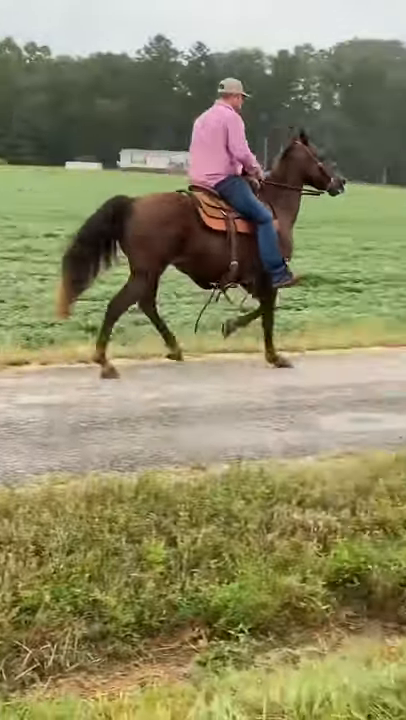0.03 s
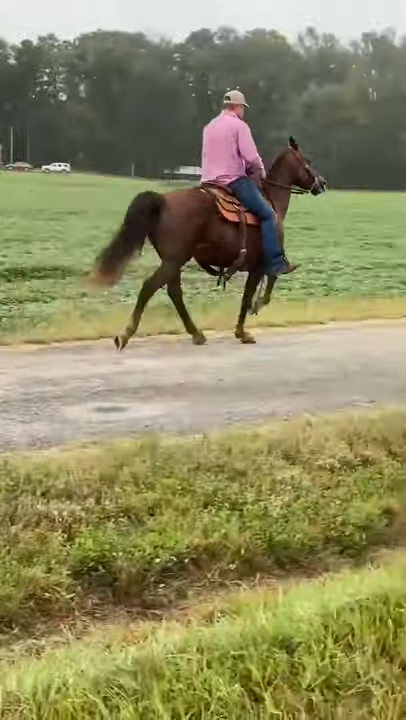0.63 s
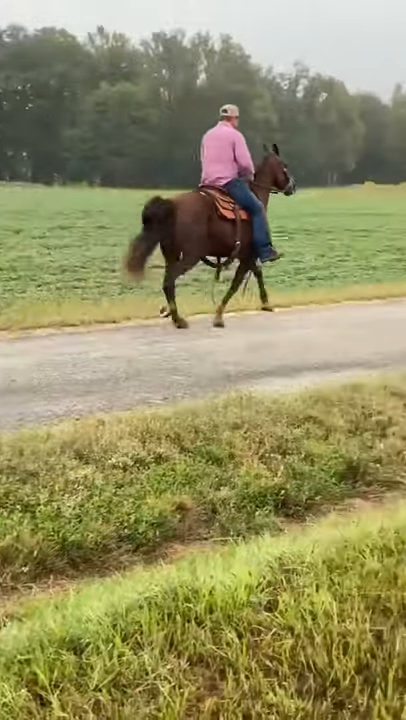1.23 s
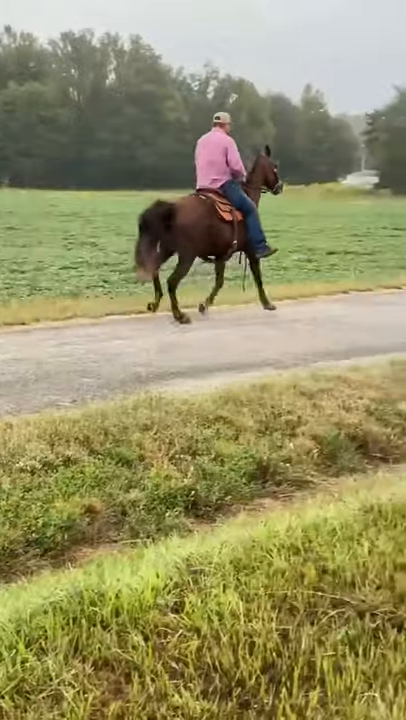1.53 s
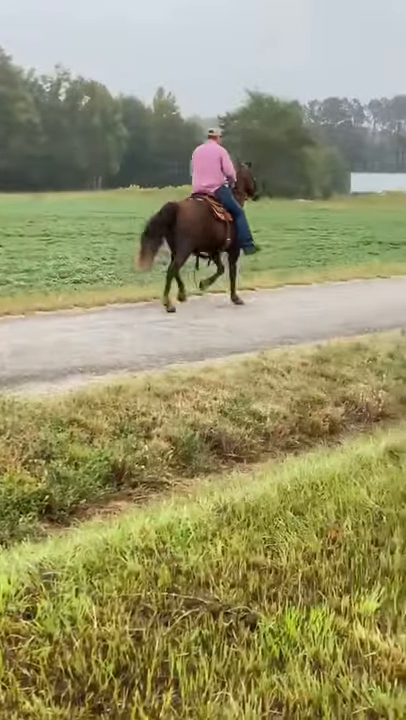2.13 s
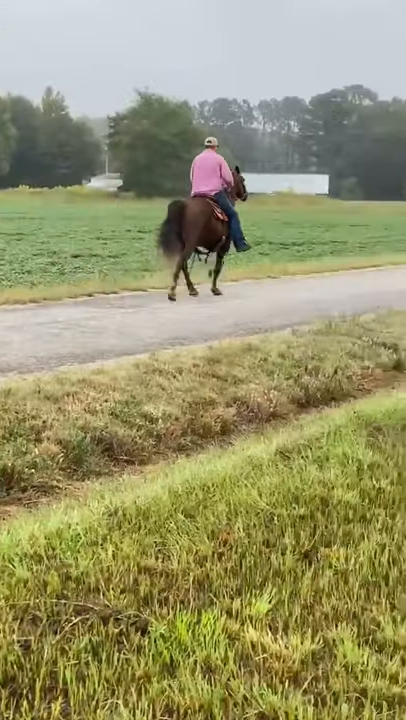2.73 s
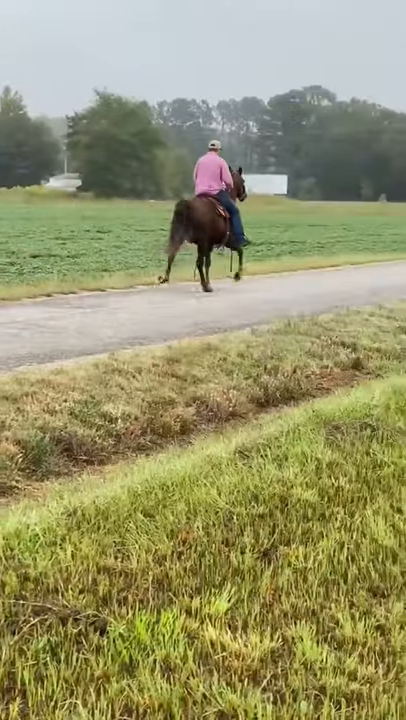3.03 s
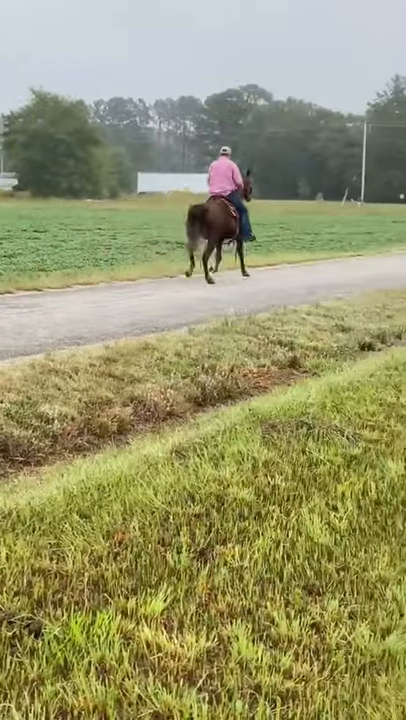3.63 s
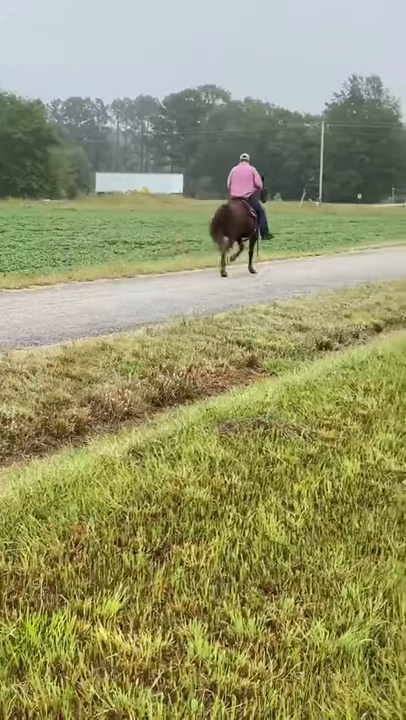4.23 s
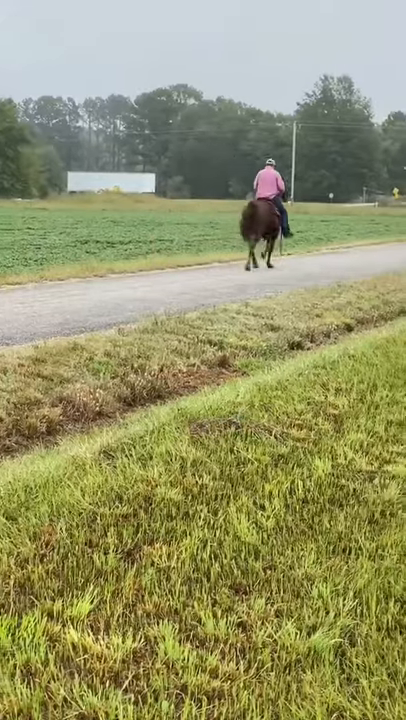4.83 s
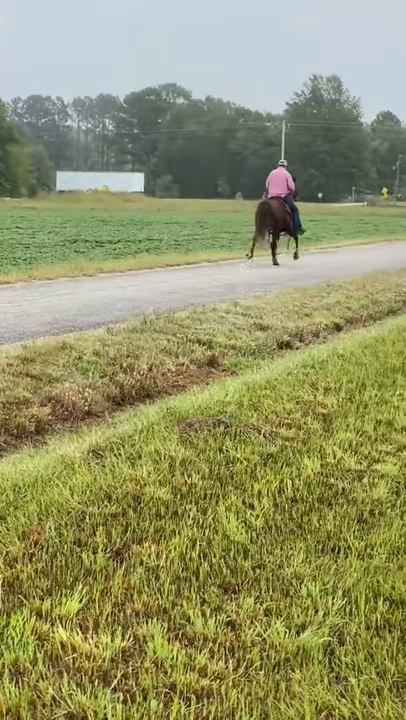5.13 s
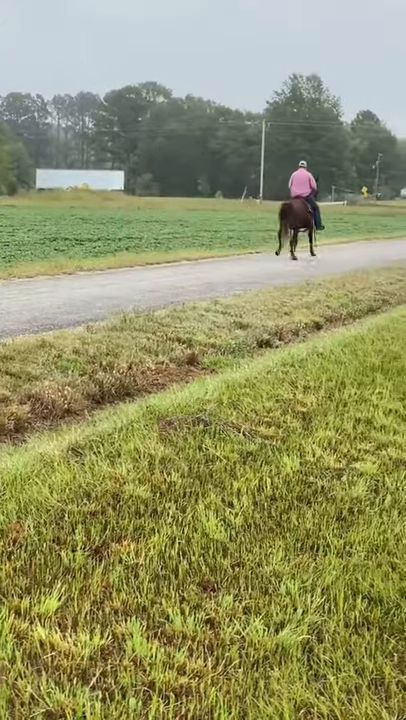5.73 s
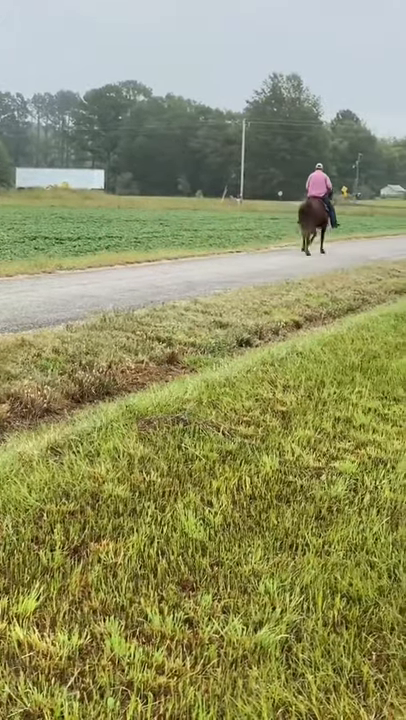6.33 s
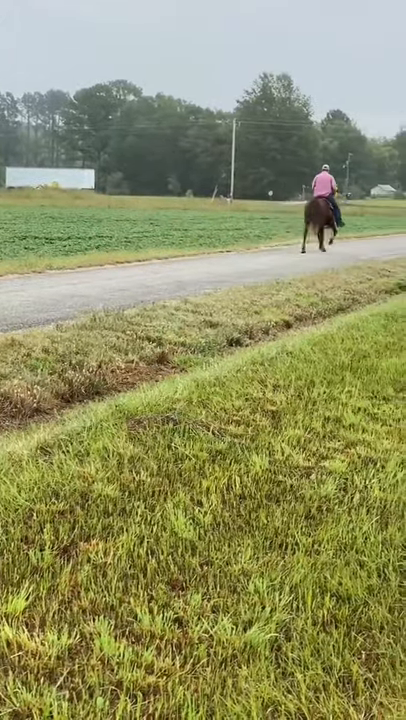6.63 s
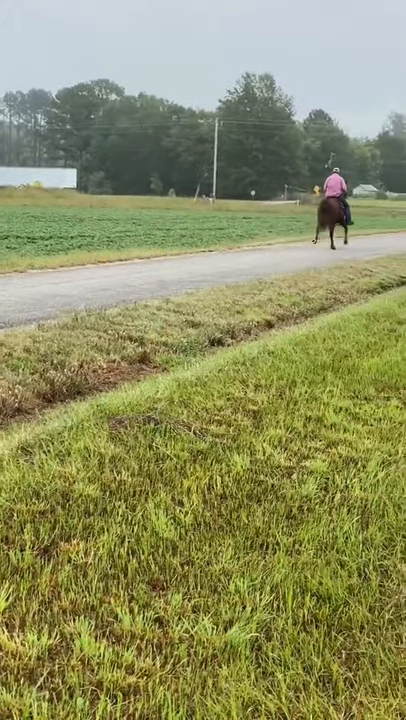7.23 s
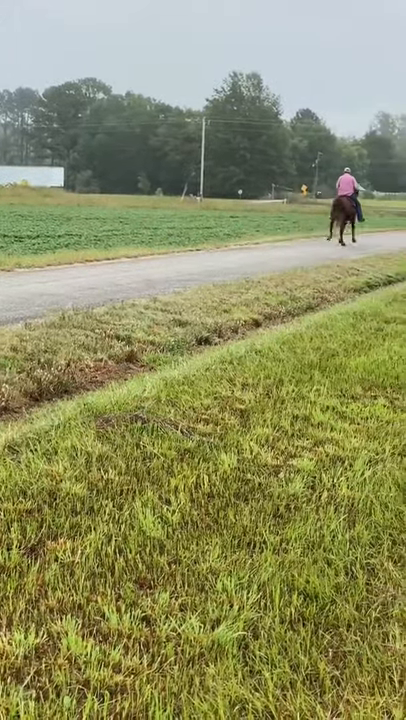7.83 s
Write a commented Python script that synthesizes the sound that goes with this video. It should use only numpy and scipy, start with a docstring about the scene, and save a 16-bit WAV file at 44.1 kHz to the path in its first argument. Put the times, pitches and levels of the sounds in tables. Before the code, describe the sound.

A shod horse trots along a paved country road, starting a few metres from the microphone. Its hooves make quick, even, hollow clops with sharp iron clicks, a little crunching grit and occasional scuffs. The beats slowly grow quieter as the horse moves away. Faint, high insect rasping builds in the fields, over still air and a soft low rumble that dies out.

```python
"""A ridden horse trots away along a paved country road, from about 4 m to 22 m off the microphone.
Each shod hoof taps with the toe, lands flat with a hollow clop of trapped air, crunches grit and sends
a late thud through the ground; hooves scuff as they lift. Insects rasp their wings in the fields,
growing louder, over still air and a low rumble that dies away. The microphone has two close ports."""
import sys
import numpy as np
from scipy import signal
from scipy.fft import rfft, irfft, next_fast_len
from scipy.io import wavfile

SR = 44100
rng = np.random.default_rng(int(sys.argv[2]) if len(sys.argv) > 2 else 0)


def transcribe(signal):
    """Save signal, clipped to [-1, 1], as a 16-bit WAV file at the path in sys.argv[1]."""
    frames = np.atleast_2d(signal).T
    limited = np.clip(frames, -1, 1)
    pcm = np.round(limited * 32767).astype(np.int16)
    wavfile.write(sys.argv[1], SR, pcm)


N = 347067
TIME = np.arange(N) / SR
AGE = np.arange(-1323, 5292) / SR  # seconds around one hoof contact
# The road passes ROAD_M from the microphone; hoof levels are set for that distance.
ROAD_M, SPEED_M_S, NEAREST_S = 4, 2.6, -.5

# hoof beats, leg after leg: start_s, clop_db, crack_db, pitch_hz
HOOF_BEATS = [(0.0262, -20.5, -30.5, 980), (0.1628, -17, -33.5, 933), (0.2892, -14, -33.5, 922),
              (0.426, -29, -37, 1060), (0.5562, -26.5, -36.0, 897), (0.6975, -25, -37.5, 980),
              (0.8231, -16, -26, 897), (0.9588, -25.5, -38.5, 980), (1.0891, -31.5, -35.0, 1034),
              (1.2379, -27.5, -32, 972), (1.3533, -25, -34.5, 907), (1.491, -27, -33, 956),
              (1.6213, -24, -29, 930), (1.7641, -24.5, -29.5, 976), (1.8804, -21, -32.5, 802),
              (2.0271, -29, -33, 1023), (2.1524, -28.5, -36, 843), (2.2918, -25.5, -31.5, 866),
              (2.4141, -19.0, -26.5, 900), (2.5694, -25.5, -28.5, 975), (2.6849, -26.0, -33.5, 933),
              (2.8206, -25.0, -31, 1000.0), (2.9427, -17.5, -26, 902), (3.1024, -25, -30.5, 1027),
              (3.2197, -21.0, -23.5, 932), (3.3565, -22, -30, 1066), (3.4667, -23.5, -29.5, 896),
              (3.6388, -24.5, -31.5, 923), (3.7515, -28, -30.5, 920.0), (3.8939, -25.5, -33, 950),
              (4.0043, -18.5, -22, 906), (4.1671, -31.0, -36.5, 874), (4.2842, -21.0, -23, 940),
              (4.422, -23, -31, 964), (4.5374, -24.5, -29, 944), (4.6973, -31.5, -37.0, 1025),
              (4.8116, -24.0, -24.5, 970), (4.9507, -25.0, -35.5, 900), (5.0631, -22.5, -35, 975),
              (5.2263, -34.0, -35.5, 930), (5.3405, -20, -28.0, 1010), (5.4856, -32, -37, 965),
              (5.5964, -28, -23.5, 935), (5.7622, -39, -29, 1024), (5.8723, -24.5, -27.5, 988),
              (6.0146, -28, -27.5, 952), (6.1205, -26.0, -31, 1020.0), (6.295, -31.5, -32, 987),
              (6.4059, -37, -29, 957), (6.5451, -26.5, -30.0, 1023), (6.658, -24, -28, 956),
              (6.8239, -38, -27.5, 950), (6.9408, -32, -29, 970), (7.0702, -27, -26.5, 980.0),
              (7.1928, -28.5, -29, 1044), (7.357, -44.0, -32.5, 1020), (7.4783, -32, -29.5, 963),
              (7.6095, -38, -34.5, 936), (7.7341, -46, -35.5, 1005)]
# how each leg lands and lifts (hind, fore, hind, fore), before the force of the step is added:
# toe_lead_s, toe_db, heel_lag_s, heel_re_clop_db, crunch_db, thud_db, lift_lag_s, lift_db
LEG_HABITS = [(.010, -39.5, 0.025, -22, -45, -44.5, 0.027, -58.5),
              (.0104, -41.5, .0075, -9, -36.5, -42, .069, -42.5),
              (0.0043, -37, 0.0072, -15.5, -38.5, -40.5, 0.099, -49),
              (.0102, -39, 0.0043, -11.5, -32, -40, 0.15, -52)]
# harder scrapes and clacks between beats: time_s, length_s, hollow_db, scrape_db
HARD_SCUFFS = [(0.227, 0.008, -47, -42), (0.363, 0.0059, -44, -53), (0.492, 0.0025, -44.5, -45),
               (0.511, 0.011, -49, -40.5), (1.025, 0.0028, -35.5, -37.5), (1.292, 0.011, -39, -49),
               (1.56, 0.0035, -38.5, -42.5), (2.088, 0.0064, -50, -37.5), (2.624, 0.008, -35.5, -37),
               (2.898, 0.0042, -36, -37), (3.012, 0.002, -30.0, -46), (3.422, 0.01, -47, -61),
               (3.68, 0.0056, -45, -37), (3.959, 0.0048, -60.5, -37), (4.096, 0.0032, -60, -39.0),
               (4.2, 0.023, -36.5, -37.5), (4.36, 0.0068, -38.0, -40.5), (4.493, 0.015, -42, -39.5),
               (5.001, 0.0049, -42, -40.0), (5.028, 0.011, -40, -38.5), (5.166, 0.0077, -42.0, -42),
               (5.276, 0.004, -40, -32.0), (5.809, 0.011, -52, -34.5), (6.073, 0.007, -46, -33.0),
               (6.733, 0.0043, -40.0, -37.5), (6.874, 0.011, -50.0, -43.5)]
# resonances of the hoof and its hollow: pitch_ratio, level_db, t60_s
HOOF_MODES = [(.82, -12.5, .012), (1, 0, .019), (1.02, -22, .05), (1.17, -7, .009), (1.38, -12, .009),
              (2.35, -14, .009)]
# rings of the iron shoe: pitch_hz
SHOE_RINGS = [1741, 2085, 3205, 6170]
# dull knocks of the leg: pitch_hz, level_re_thud_db
LEG_KNOCKS = [(240, 1), (345, -7), (470, -4.5)]
# weight of the thuds along the road: time_s, gain_db
THUD_TREND = [(0, 0.5), (1, -2), (4.1, -2.5), (4.6, -6), (6, -10.5), (7.87, -3)]
# iron striking the paving: frequency_hz, level_db
CRACK_SPECTRUM = [(30, -67), (350, -10), (600, -20.5), (850, -7.5), (1300, 4), (1700, -1.5), (2300, 2),
                  (2750, 0), (3200, -2.5), (4200, -1.5), (5000, -3.5), (6200, -10), (7200, -7.5),
                  (11000, -44)]
# grit grinding: frequency_hz, level_db
GRIT_SPECTRUM = [(30, -27), (400, -21.5), (630, -10), (1000, -1), (1600, 0), (2250, -1.5), (2750, -2.5),
                 (3200, -4.5), (4300, -7), (6200, -8), (7300, -18), (11000, -49.5)]
# fine sand hissing: frequency_hz, level_db
SAND_SPECTRUM = [(3000, -38), (6000, -13), (7300, -1), (8600, 0), (10500, -6), (11900, -22)]
# the near insect rasp: frequency_hz, level_db
RASP_SPECTRUM = [(5000, -45), (7000, -18), (7900, -6), (8400, 0), (8950, -1), (9300, -13), (9650, -35),
                 (12000, -50)]
# insects further into the field: frequency_hz, level_db
SHIMMER_SPECTRUM = [(5000, -40), (7000, -10), (7700, -3), (8300, 0), (8700, -8), (9300, -30), (12000, -45)]
# swell of all the insects: time_s, gain_db
INSECT_TREND = [(0, -11), (4.5, -3.5), (5.8, 0), (7.87, 0)]
# still country air: frequency_hz, level_db
AIR_SPECTRUM = [(20, -21.5), (45, 3.5), (90, -10), (200, 2), (400, -9.5), (600, -8), (950, -1), (1450, -18),
                (2200, -16), (3500, -15.5), (4400, -17), (5600, -16), (7000, -27.5), (9000, -41),
                (12000, -56.5)]
# low outdoor rumble: frequency_hz, level_db
RUMBLE_SPECTRUM = [(20, -16), (45, 1), (90, 3), (150, 1.5), (300, -8), (550, -7), (950, -4), (1500, -32.5),
                   (4000, -61.5), (8000, -48)]
# the rumble dying away: time_s, level_db
RUMBLE_TREND = [(0, -57.5), (1.4, -57.5), (2.8, -60.5), (4.3, -62.5), (4.7, -67), (5.3, -83), (7.87, -103)]
# lead of the left microphone port over the right: frequency_hz, phase_rad
PORT_PHASE = [(60, .1), (300, .3), (700, .4), (1100, .2), (1700, .15), (2400, .4), (3900, .45), (5000, 1.7),
              (5700, 1.3), (6500, 2.1), (7800, 2.65), (11500, 2.7)]


def horse(field_db=-33, fade_s=.093, onset_s=.0041):
    """Trot and scuffs at the microphone, with a faint scatter back from the verge and the field."""
    track = trot()
    for s, length_s, hollow_db, scrape_db in HARD_SCUFFS:
        add(track, s, spreading(s) * scuff(s, length_s, hollow_db, scrape_db))
    t = TIME[:SR // 2]
    scatter = rng.standard_normal(len(t)) * np.exp(-t / fade_s) * (1 - np.exp(-t / onset_s))
    return track + undb(field_db) * signal.fftconvolve(track, scatter / np.linalg.norm(scatter))[:N]


def trot(usual_step_db=-29, force_share=.5, side_on_db=-10, sand_db=-49, lift_s=.0096):
    """Four legs land in turn, no two steps alike; shortly after each beat another hoof lifts."""
    track = np.zeros(N)
    for k, (s, clop_db, crack_db, hz) in enumerate(HOOF_BEATS):
        lead_s, toe_db, heel_lag_s, heel_db, crunch_db, thud_db, lift_lag_s, lift_db = LEG_HABITS[k % 4]
        toe_stretch, heel_stretch, lift_stretch = 1 + .1 * rng.standard_normal(3)
        toe_luck, heel_luck, crunch_luck, lift_luck = 1.5 * rng.standard_normal(4)  # dB
        # a harder step also taps, crunches, thuds and lifts harder
        force_db = force_share * ((clop_db + crack_db) / 2 - usual_step_db)
        # grit is kicked backwards, so it is weaker from the side than from behind
        grit_db = force_db + side_on_db * spreading(s) ** 2
        beat = hoof_beat(clop_db, crack_db, hz, lead_s * toe_stretch, toe_db + force_db + toe_luck,
                         heel_lag_s * heel_stretch, clop_db + heel_db + heel_luck,
                         crunch_db + grit_db + crunch_luck, sand_db + force_db - sand_loss_db(s))
        weight = thud(thud_db + force_db + np.interp(s, *np.transpose(THUD_TREND)))
        add(track, s, spreading(s) * (beat + weight))
        scrape_db = lift_db + grit_db + lift_luck
        lift = scuff(s, lift_s, hollow_db=scrape_db - 9, scrape_db=scrape_db)
        add(track, s + lift_lag_s * lift_stretch, spreading(s) * lift)
    return track


def hoof_beat(clop_db, crack_db, hz, lead_s, toe_db, heel_lag_s, heel_db, crunch_db, sand_db,
              toe_s=.0014, slap_s=.0016, heel_s=.0012, crush_s=.007, settle_s=.07):
    """The toe taps, the hoof rolls over grit and slaps flat, the heel settles and stones grind."""
    roll = grains(2.5) * (AGE > -lead_s) * np.exp(-np.abs(AGE) / .003) * (AGE < 0)
    toe = grains(1.5) * (fall(-lead_s, toe_s) + .22 * fall(-lead_s, .012) * (AGE < 0))
    slap = grains(1.5) * (fall(0, slap_s) - fall(0, .0005) + .03 * fall(0, .005)) + .06 * roll
    heel = grains(1.5) * fall(heel_lag_s, heel_s)
    crunch = clumps() * (grains(5.5) * fall(.0036, crush_s) + .04 * grains(3) * fall(.006, settle_s))
    # the sole traps air twice: when it slaps flat and when the heel settles
    push = signal.unit_impulse(len(AGE), np.searchsorted(AGE, -.0005))
    hollow = at_level(hoof_ring(push + .02 * slap + .014 * roll, hz), clop_db)
    hollow += at_level(hoof_ring(heel, hz), heel_db)
    # a flatter landing, with a shorter lead, lets the toe sound the hollow too
    hollow += at_level(hoof_ring(toe, hz), toe_db + 5 - 450 * lead_s)
    hollow += at_level(hoof_ring(crunch, hz), crunch_db - 8)
    grit = at_level(colour(crunch, GRIT_SPECTRUM), crunch_db)
    grit += at_level(colour(heel, GRIT_SPECTRUM), heel_db - 9)
    iron = at_level(shoe(slap), crack_db) + at_level(shoe(toe), toe_db)
    sand_force = at_level(slap, -4) + at_level(toe, -10) + at_level(crunch, 0)
    sand = at_level(colour(sand_force, SAND_SPECTRUM), sand_db)
    return hollow + iron + grit + sand


def hoof_ring(force, hz, detune=.04, rise_s=.0006, lowest_hz=790):
    """The hoof wall and the air cupped under the sole ring, a little differently at each contact."""
    t = AGE - AGE[0]
    modes = np.zeros(len(t))
    for ratio, db, t60_s in HOOF_MODES:
        strength, tune = rng.standard_normal(2)
        mode_hz = hz * ratio * (1 + detune * tune * (ratio != 1))
        modes += undb(db + 2 * strength - 60 * t / t60_s) * np.sin(2 * np.pi * mode_hz * t)
    # so small a body radiates little below its resonances
    radiate = signal.butter(3, lowest_hz, "high", fs=SR, output="sos")
    response = signal.sosfilt(radiate, modes * (1 - np.exp(-t / rise_s)))
    return signal.fftconvolve(force, response)[:len(AGE)]


def shoe(force, detune=.04, ring_db=3, spread_db=3.5, width_hz=190):
    """The nailed-on shoe cracks on the paving with a few damped rings that shift at each landing."""
    iron = force
    for hz in SHOE_RINGS:
        tune, strength = rng.standard_normal(2)
        peak = signal.iirpeak(hz * (1 + detune * tune), hz / width_hz, fs=SR)
        iron = iron + undb(ring_db + spread_db * strength) * signal.lfilter(*peak, force)
    return colour(iron, CRACK_SPECTRUM)


def thud(db, start_hz=190, end_hz=88, glide_s=.014, knock_s=.0028):
    """The leg knocks dully; the ground carries low waves slowest, so they come late and sink in pitch."""
    late, tune, stiff, firm = rng.standard_normal(4)
    hz = (end_hz + (start_hz - end_hz) * np.exp(-np.maximum(AGE, 0) / glide_s)) * (1 + .18 * tune)
    swell = np.exp(-.5 * ((AGE - .029 - .004 * late) / .014) ** 2)
    ground_wave = at_level(swell * np.sin(2 * np.pi * np.cumsum(hz) / SR), db - 1 + 2 * firm)
    push = fall(0, knock_s) - fall(0, .00014)
    knocks = sum(at_level(push * np.sin(2 * np.pi * knock_hz * (1 + .1 * stiff) * AGE), db + knock_db)
                 for knock_hz, knock_db in LEG_KNOCKS)
    return ground_wave + knocks


def scuff(s, length_s, hollow_db, scrape_db):
    """A lifting hoof drags over stones and sand; a very short one is a clack, as when a hind shoe strikes a
    front shoe."""
    drag = grains(3) * clumps() * np.exp(-(np.abs(AGE) / length_s) ** 1.4)
    hollow = at_level(hoof_ring(drag, hz=980), hollow_db)
    scrape = at_level(colour(drag, GRIT_SPECTRUM), scrape_db)
    sand = at_level(colour(drag, SAND_SPECTRUM), scrape_db - 12 - sand_loss_db(s))
    return hollow + scrape + sand


def grains(spread_db):
    """Stone grains break in dense clicks of very unequal size."""
    clicks = rng.standard_normal(len(AGE))
    clicks *= undb(spread_db * np.minimum(rng.exponential(size=len(AGE)), 6))
    return clicks / clicks.std()


def clumps(spread_db=5, rate_hz=700):
    """Stones give way in bunches: a gain that jumps about from one millisecond to the next."""
    return undb(spread_db * drift(rate_hz, AGE - AGE[0]))


def loose_grit(level_db=-66, spread_db=7.5):
    """Loose grit stirs unevenly around the hooves, fainter as the horse gets further off."""
    return noise(GRIT_SPECTRUM) * spreading(TIME) * undb(level_db + spread_db * drift(60))


def distance(s):
    """Metres from the microphone to the horse at time s."""
    return np.hypot(ROAD_M, SPEED_M_S * (s - NEAREST_S))


def spreading(s):
    """The horse's sound falls as one over the distance."""
    return ROAD_M / distance(s)


def sand_loss_db(s, db_per_m=.7):
    """Air and grass soak up the sand's fine treble on its way to the microphone."""
    return db_per_m * (distance(s) - ROAD_M)


def insects(rasp_db=-65, shimmer_db=-74, phrase_hz=3.57, stroke_hz=131):
    """Nearby, wing strokes rasp in short, uneven phrases; others blend into a lower shimmer behind."""
    phrases = np.cos(np.pi * (phrase_hz * (TIME - 7.32) + .2 * drift(3))) ** 2
    stroke_phase = np.cumsum(stroke_hz * (1 + .1 * drift(25))) / SR % 1
    strokes = colour(rng.standard_normal(N) * np.exp(-2 * stroke_phase), RASP_SPECTRUM)
    shimmer = undb(shimmer_db + 3.5 * drift(16)) * noise(SHIMMER_SPECTRUM)
    rasp = undb(rasp_db + 3 * drift(20)) * phrases * strokes / strokes.std()
    return undb(np.interp(TIME, *np.transpose(INSECT_TREND))) * (rasp + shimmer)


def country_air(air_db=-73):
    """Still air over the fields, and a low rumble that dies away."""
    rumble_db = np.interp(TIME, *np.transpose(RUMBLE_TREND)) + 2.6 * drift(6)
    air = undb(air_db + 1.3 * drift(1.7)) * noise(AIR_SPECTRUM)
    return air + undb(rumble_db) * noise(RUMBLE_SPECTRUM)


def undb(db):
    """Decibels to gain."""
    return 10 ** (np.asarray(db) / 20)


def at_level(x, db):
    """Scale a short sound so that its energy, spread over 10 ms, has this rms level."""
    return x * undb(db) / np.sqrt(np.sum(x ** 2) / 441 + 1e-18)


def at_bins(table, size):
    """A table over frequency, read at the bins of a spectrum."""
    hz, value = np.transpose(table)
    return np.interp(np.log(np.fft.rfftfreq(size, 1 / SR) + 1), np.log(hz), value)


def colour(x, spectrum):
    """Causal filter with the given spectrum, so that attacks stay sharp."""
    size = next_fast_len(len(x) + 1024)
    cepstrum = irfft(np.log(undb(at_bins(spectrum, size))), size)
    cepstrum[1:size // 2] *= 2
    cepstrum[size // 2 + 1:] = 0
    return irfft(rfft(x, size) * np.exp(rfft(cepstrum)), size)[:len(x)]


def noise(spectrum):
    """Steady coloured noise of rms 1."""
    x = colour(rng.standard_normal(N), spectrum)
    return x / x.std()


def drift(rate_hz, t=TIME):
    """Random wander, spread near 1."""
    knots = rng.standard_normal(1000)
    return np.interp(t * rate_hz, np.arange(len(knots)), knots)


def fall(start_s, decay_s):
    """Sudden start, exponential decay."""
    return (AGE >= start_s) * np.exp(-np.maximum(AGE - start_s, 0) / decay_s)


def add(track, s, sound):
    """Mix a short sound into the track with its age zero at s."""
    index = np.arange(len(AGE)) + int((s + AGE[0]) * SR)
    inside = (index >= 0) & (index < N)
    track[index[inside]] += sound[inside]


def scene(port_air_db=-77.5):
    """At the roadside two close ports hear everything apart in phase, each with a little air of its own."""
    spectrum = rfft(horse() + loose_grit() + insects() + country_air())
    turn = np.exp(.5j * at_bins(PORT_PHASE, N))
    ports = np.array([irfft(spectrum * turn, N), irfft(spectrum / turn, N)])
    return ports + undb(port_air_db) * np.array([noise(AIR_SPECTRUM), noise(AIR_SPECTRUM)])


def record(dry, bass_hz=42, top_hz=11900):
    """The deepest bass and the highest treble are cut away."""
    thin = signal.sosfilt(signal.butter(3, bass_hz, "high", fs=SR, output="sos"), dry)
    return signal.sosfilt(signal.ellip(8, .2, 70, top_hz, fs=SR, output="sos"), thin)


dry = scene()
out = record(dry)
transcribe(out)
```